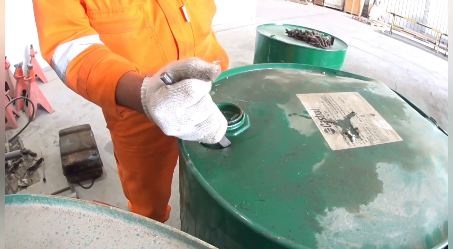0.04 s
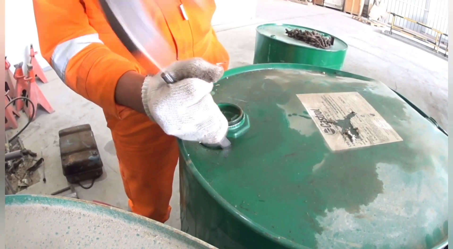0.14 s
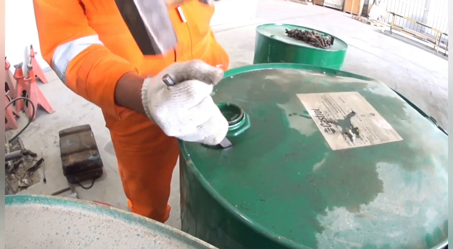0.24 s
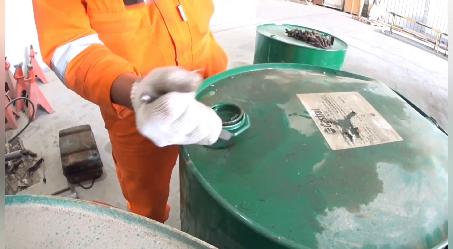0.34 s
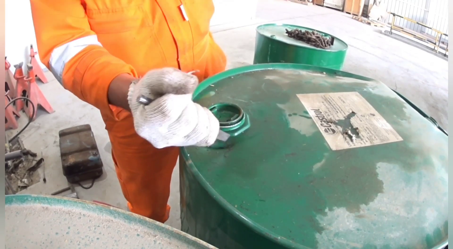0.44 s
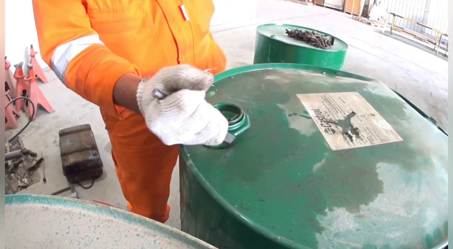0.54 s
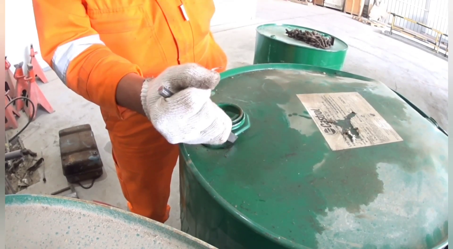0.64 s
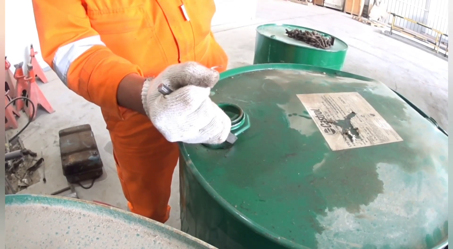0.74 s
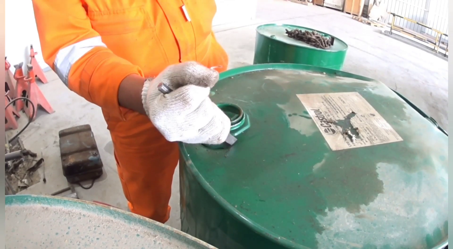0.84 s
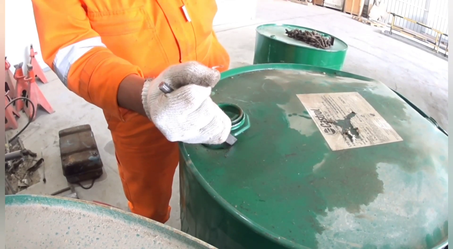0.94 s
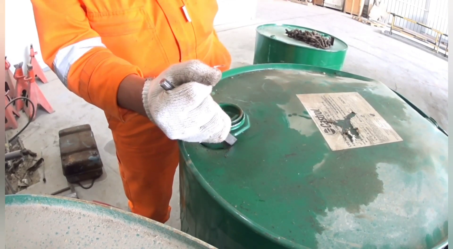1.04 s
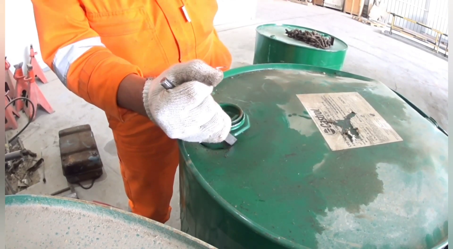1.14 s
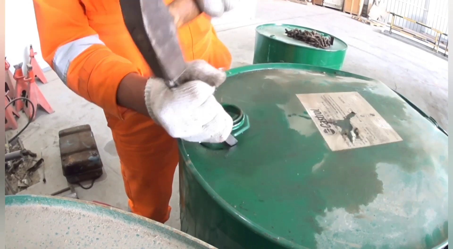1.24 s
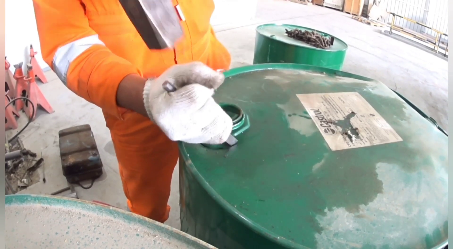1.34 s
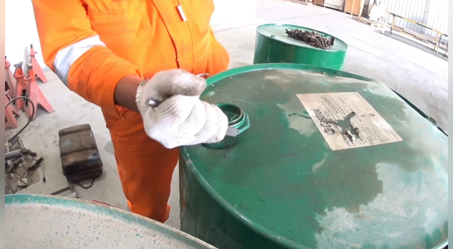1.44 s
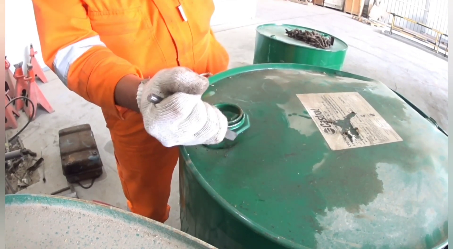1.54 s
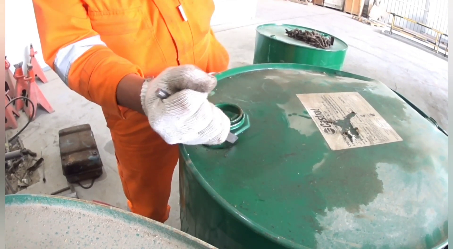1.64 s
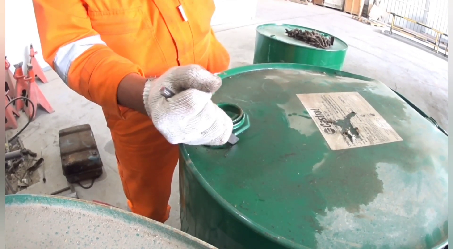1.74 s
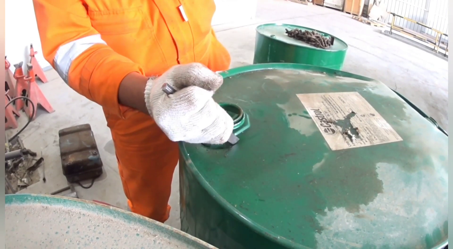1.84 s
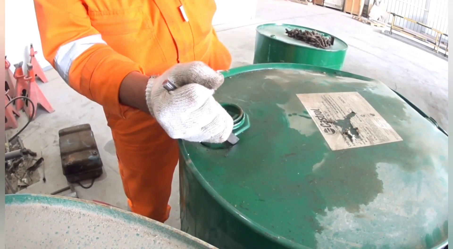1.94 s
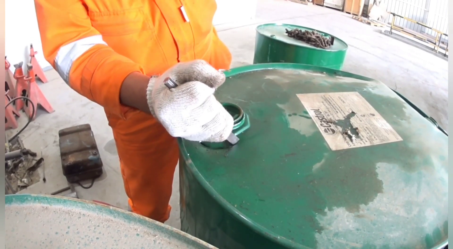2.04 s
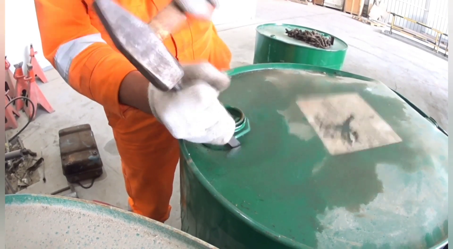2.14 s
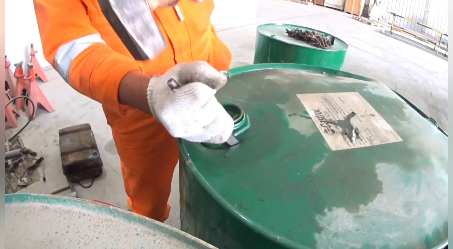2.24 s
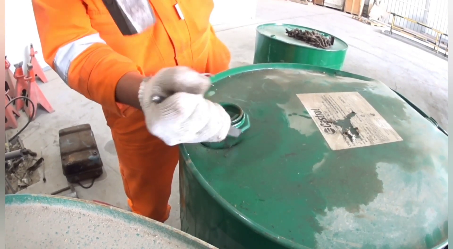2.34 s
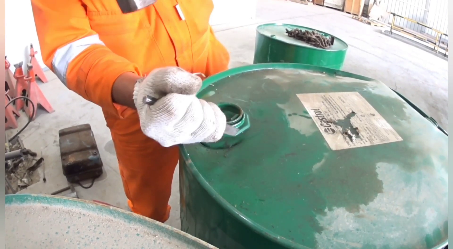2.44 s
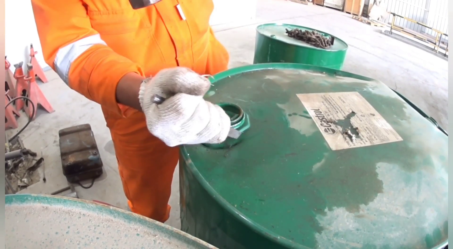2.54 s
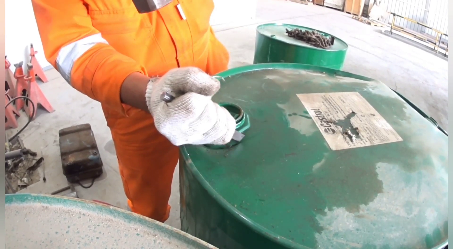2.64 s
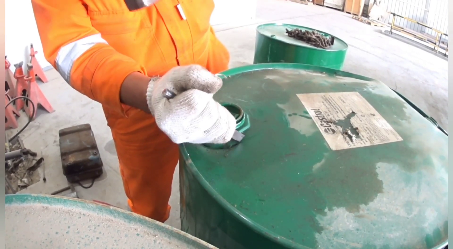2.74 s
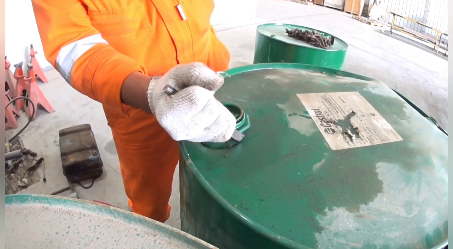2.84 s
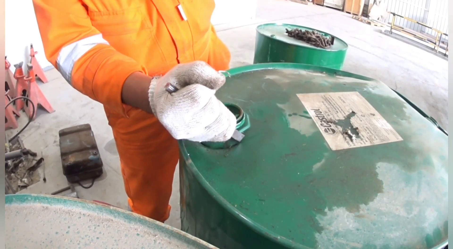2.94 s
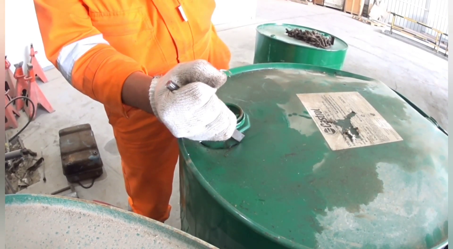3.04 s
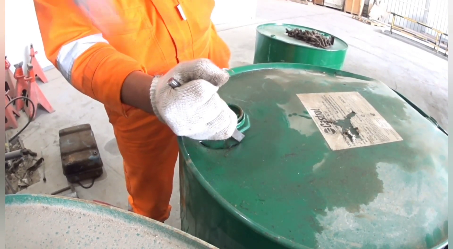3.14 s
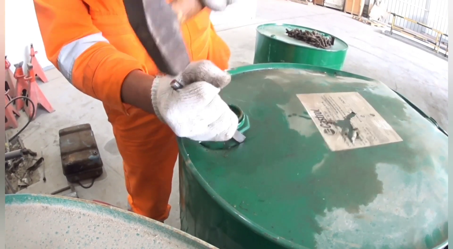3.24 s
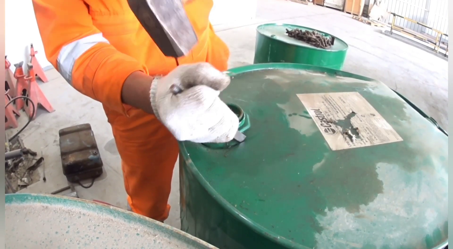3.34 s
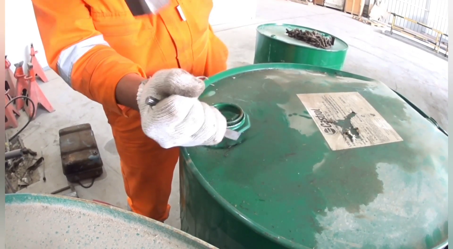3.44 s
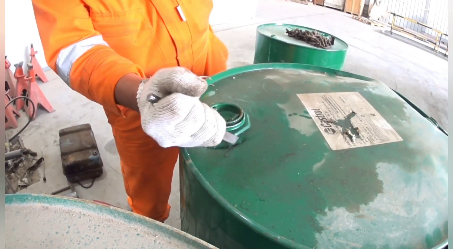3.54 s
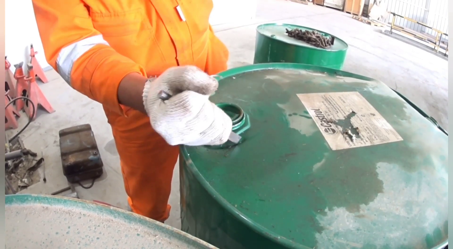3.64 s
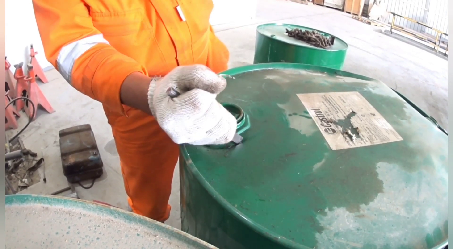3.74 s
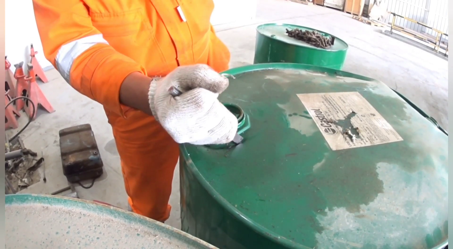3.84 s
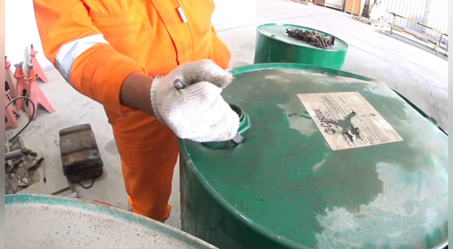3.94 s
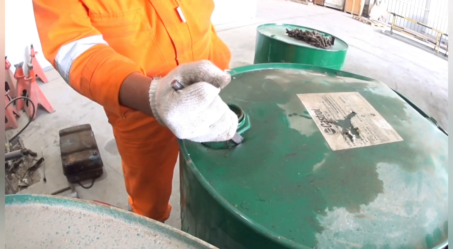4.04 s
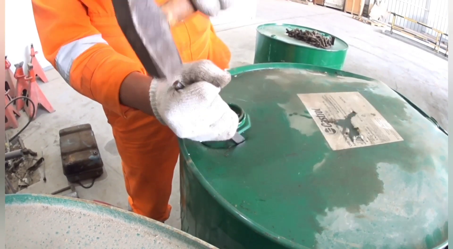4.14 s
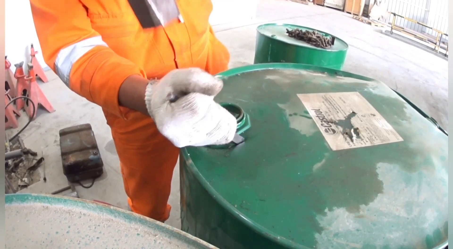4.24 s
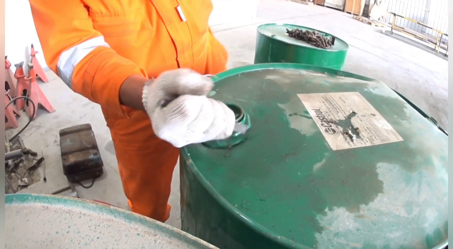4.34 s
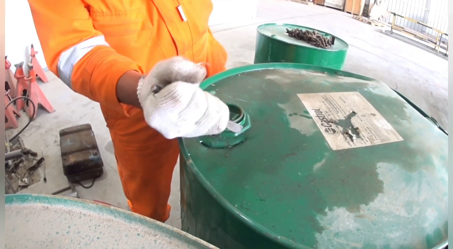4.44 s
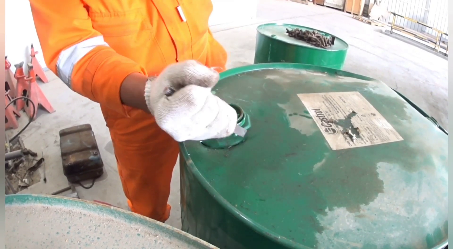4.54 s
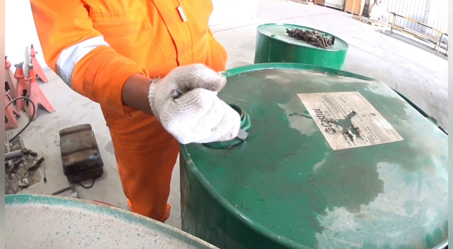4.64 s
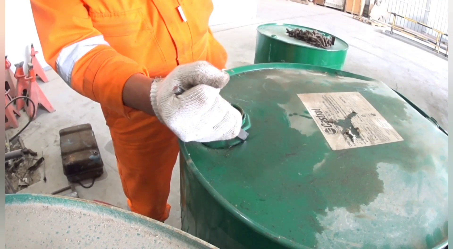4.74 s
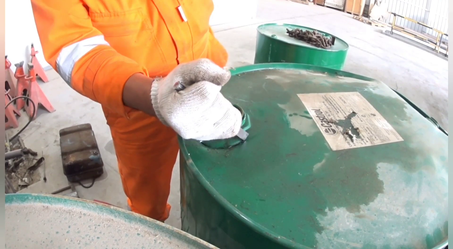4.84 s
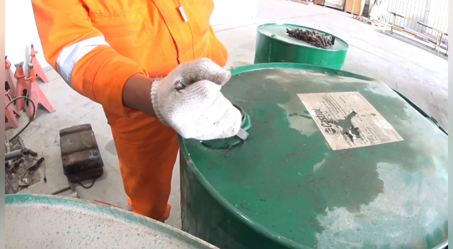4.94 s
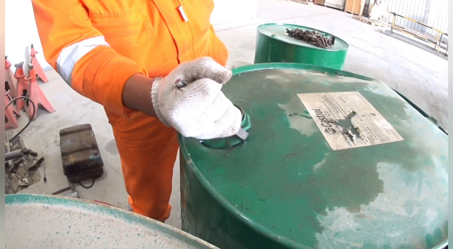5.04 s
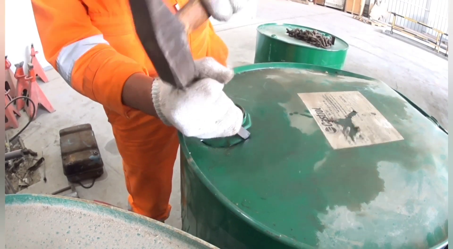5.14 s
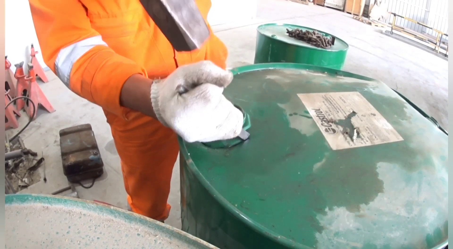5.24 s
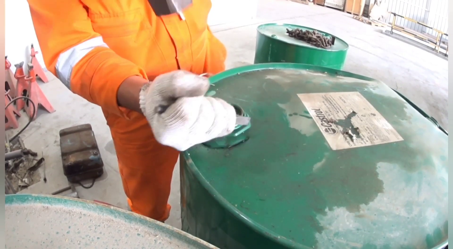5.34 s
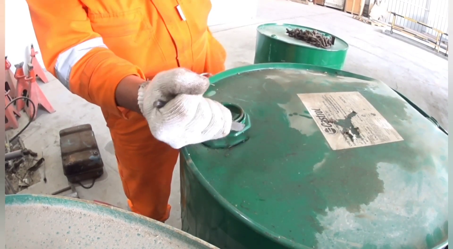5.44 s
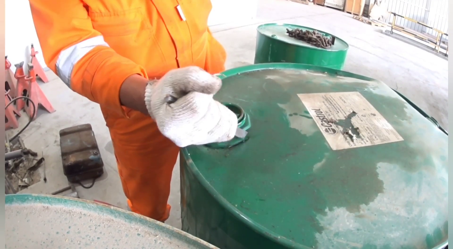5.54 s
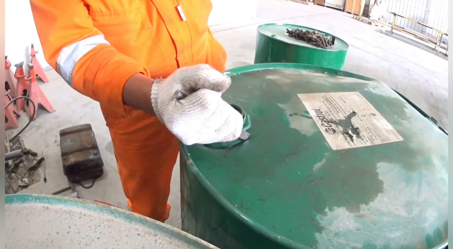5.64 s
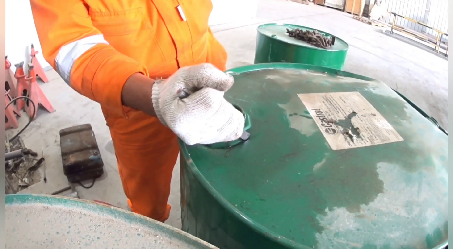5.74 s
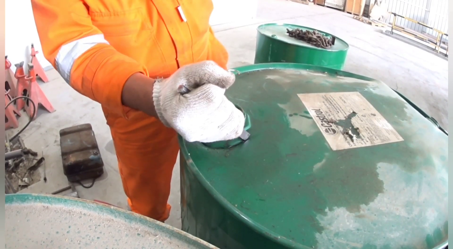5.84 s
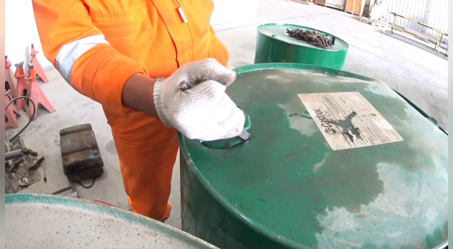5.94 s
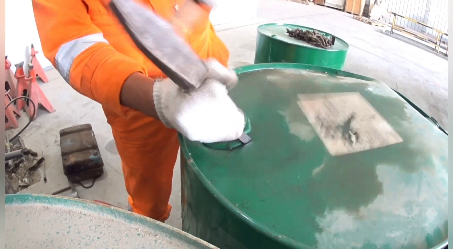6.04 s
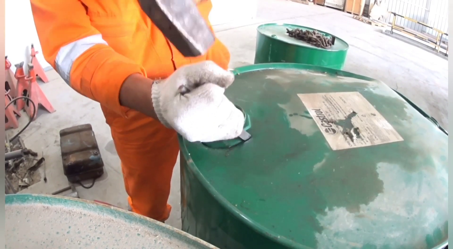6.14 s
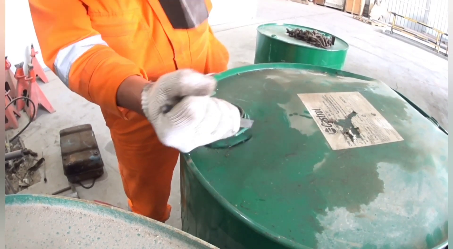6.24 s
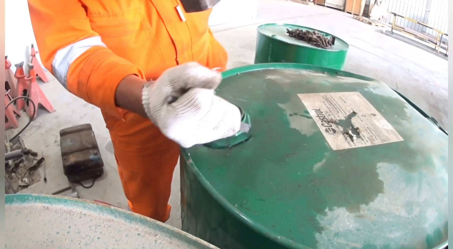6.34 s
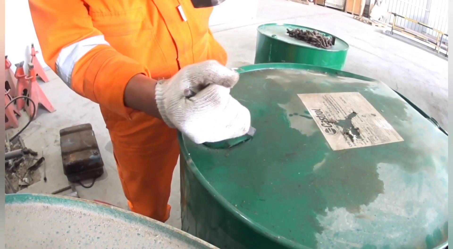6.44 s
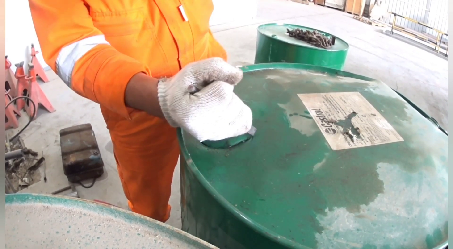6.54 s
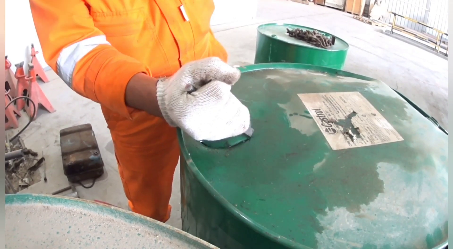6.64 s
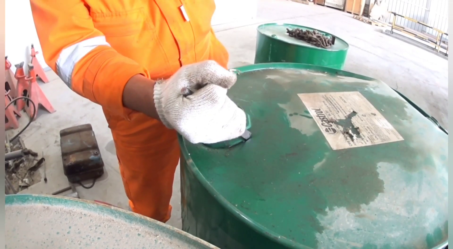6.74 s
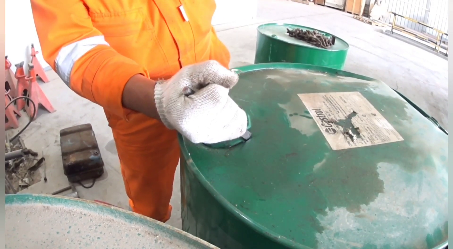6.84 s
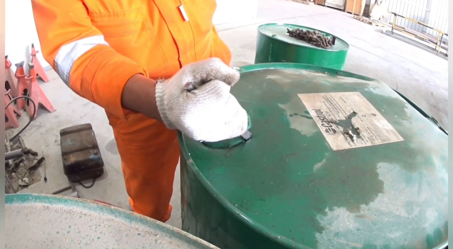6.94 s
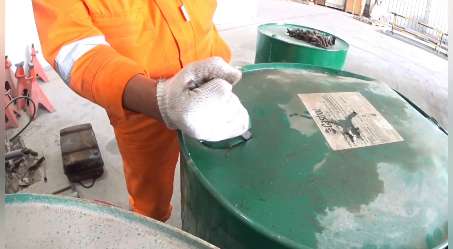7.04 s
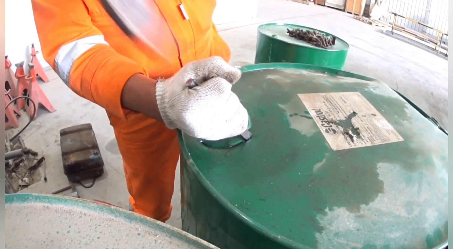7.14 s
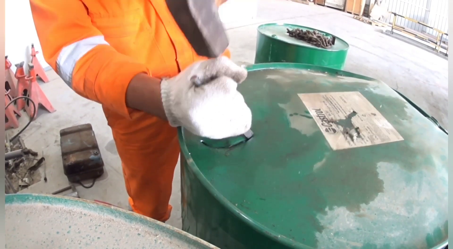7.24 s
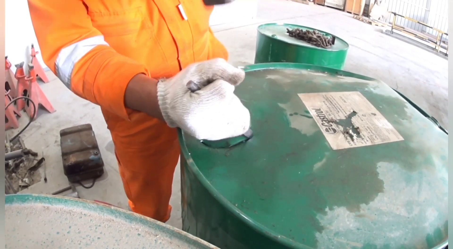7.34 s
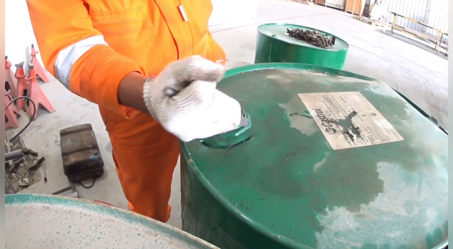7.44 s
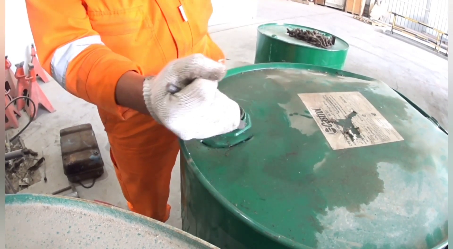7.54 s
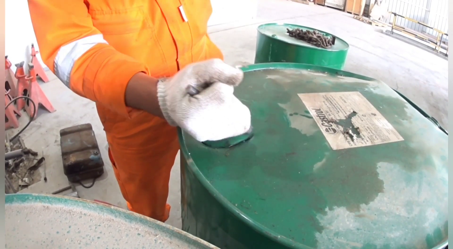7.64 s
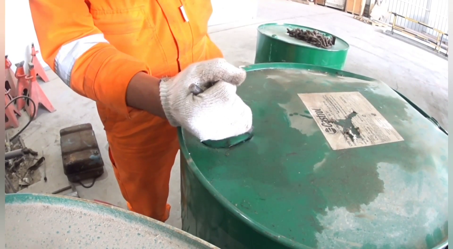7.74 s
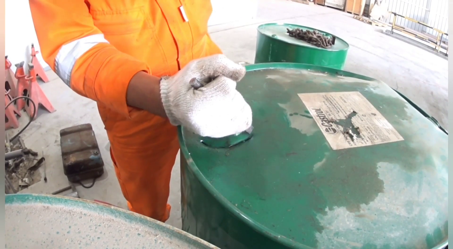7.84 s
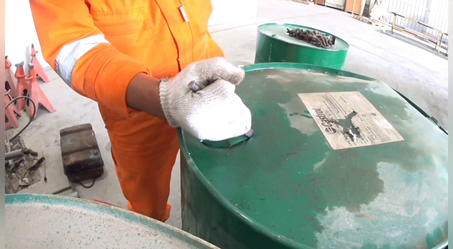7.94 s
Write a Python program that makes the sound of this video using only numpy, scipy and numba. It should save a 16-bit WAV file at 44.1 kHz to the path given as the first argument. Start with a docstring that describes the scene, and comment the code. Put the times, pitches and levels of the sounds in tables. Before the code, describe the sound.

A hammer drives a chisel into a steel drum lid about once a second, each hard clanging blow booming and ringing through a large workshop.

```python
"""Chisel on a steel drum

In a large workshop, close to two microphone ports, a hammer drives a chisel into a drum lid about once a second.
Each blow is a noise crack, decaying tones for drum and tools, and banded noise for the hall; the chisel bounces.
Far off, noise and wavering tones make the machines, a thin hiss comes and goes, and a motor whine climbs near the end.
The camera's fast gain control flattens the loudest part, then a low-pass cuts the top treble.
"""
import sys
import numpy as np
from scipy import signal
from scipy.fft import rfft, irfft
from scipy.io import wavfile
from scipy.ndimage import uniform_filter1d, map_coordinates
from numba import njit

SR = 44100
rng = np.random.default_rng(int(sys.argv[2]) if len(sys.argv) > 2 else 0)


def output_pcm(signal):
    """Save a mono or channel-first signal as 16-bit PCM at the path in sys.argv[1].

    Samples are clipped to [-1, 1] before scaling.
    """
    pcm = np.clip(np.atleast_2d(signal).T, -1, 1) * 32767
    wavfile.write(sys.argv[1], SR, np.round(pcm).astype(np.int16))


N = 352800
PAD = SR  # samples of lead-in, cut off at the end

# hammer blows; the mode levels depend on where the chisel bites:
# (time [s], strength [dB], drum boom [dB], hum [dB], bark [dB], bell [dB], hammer ring [dB])
BLOWS = [(0.197, -7.5, 1, 4.5, -22, 1, 2), (1.244, -8, -3, -5, 1, 4.5, 16), (2.190, -8, 4, 7.5, 8, 4, 3),
         (3.22, -8, 1, 2.5, -5, 1, 4), (4.129, -9.5, 10.5, 7.5, -8, 5, 3),
         (5.151, -7.5, -9, 4, 15.5, -3, 3), (6.079, -9, 4.5, -0.5, 12, 1.5, 3.5),
         (7.198, -8.5, 4, 9, -3, -9, -15)]
# a blow before the start, only its tail is heard: same columns
EARLIER_BLOW = (-.8, -8, 0, 0, 0, 0, 0)


def hammer_blows():
    """Times and strengths of the impacts, and how strongly each feeds the named drum modes and the hammer."""
    blow_s, blow_db, *named_db, hammer_db = np.transpose([EARLIER_BLOW, *BLOWS])
    return blow_s, blow_db, np.array(named_db), hammer_db


# modes of the drum, the first four are boom, hum, bark and bell:
# (frequency [Hz], relative level [dB], t60 [s])
DRUM_MODES = [(110, -22, 0.5), (206.5, -21, 2.48), (371, -20, 1.8), (416.3, -3, 1.78), (154.3, -28, 0.89),
              (250, -13, 0.88), (281.3, -12.5, 1.51), (400.3, -10, 2.25), (450.7, -3, 0.74),
              (562, -19.5, 2.8), (614, -10.5, 1.46), (640, -13, 1.77), (654, -13, 1.1), (709, -7.5, 1.46),
              (755, -12.5, 0.93), (811, -5.5, 1.31), (838, -5.5, 1.57), (883, -11.5, 1.76),
              (884, -12.5, 2.67), (968, -17.5, 3.36), (1047, -8, 1.86), (1070, -18, 2.6),
              (1143, -17.5, 2.65), (2100, -28, 1)]
DRUM_BLOOM_S, DRUM_SCATTER_DB = 0.052, 3
CONTACT_S = 0.00083  # rise time of direct steel contact


def drum_ring(blow_s, blow_db, named_db):
    """Named modes start at contact; in the others the shell takes up the lid's shaking gradually."""
    count = len(named_db)
    named = ring(blow_s, blow_db + named_db, DRUM_MODES[:count], 0, CONTACT_S)
    shell = ring(blow_s, blow_db, DRUM_MODES[count:], DRUM_SCATTER_DB, DRUM_BLOOM_S)
    return named + shell


# modes of the chisel: (frequency [Hz], relative level [dB], t60 [s])
CHISEL_MODES = [(3337, -21, .8), (5034, -15, .5), (5058, -12, .5), (5088, -19, .45), (8785, -29, .3)]
# mode of the hammer: (frequency [Hz], relative level [dB], t60 [s])
HAMMER_MODES = [(9957, -22, .45)]
CHISEL_RING_DB, TOOL_BLOOM_S = -3, .04


def tool_ring(blow_s, blow_db, hammer_db):
    """Chisel and hammer swell gradually, as they ring freely only once they have parted."""
    chisel = ring(blow_s, blow_db + CHISEL_RING_DB, CHISEL_MODES, 0, TOOL_BLOOM_S)
    hammer = ring(blow_s, blow_db + hammer_db, HAMMER_MODES, 0, TOOL_BLOOM_S)
    return chisel + hammer


# colour of the crack: (frequency [Hz], relative level per Hz [dB])
CRACK_COLOUR = [(60, -60), (200, -28), (600, -4), (1230, -13), (1700, -2), (3190, -3.5), (4570, -9.5),
                (7450, -14.5), (15000, -29), (16300, -41)]
CRACK_DB, CRACK_T60_S = -4, 0.15


def crack(blow_s, blow_db):
    """The impact itself: a noise burst that dies quickly."""
    return burst(blow_s, blow_db + CRACK_DB, CRACK_COLOUR, CRACK_T60_S)


# clear ticks as the chisel is set down again or rattles on the lid: (time [s], level [dB])
TICKS = [(0.3506, -20), (2.4304, -34), (4.3889, -30), (4.4394, -61), (4.5311, -36), (4.6155, -25),
         (7.2474, -27), (7.3352, -29), (7.3726, -29), (7.6949, -35.5)]
# colour of ticks and bounces: (frequency [Hz], relative level per Hz [dB])
TICK_COLOUR = [(300, -8.5), (1500, 10), (4000, -0.5), (8000, -13.5), (12000, -32), (16000, -39)]
TICK_T60_S, TICK_RING_DB = 0.14, 2.5
BOUNCES, BOUNCE_WITHIN_S = 12, .3  # after each blow
BOUNCE_DB, BOUNCE_SCATTER_DB, BOUNCE_FADE_DB_PER_S = -15, 3, 67
BOUNCE_RING_DB, BOUNCE_RING_T60_S = 13.5, 0.077


def chisel_ticks(blow_s, blow_db):
    """Ticks and random, weakening bounces spray noise and ring the chisel, which the glove soon stills."""
    late_s = BOUNCE_WITHIN_S * rng.random((len(blow_s), BOUNCES))
    scatter_db = BOUNCE_SCATTER_DB * rng.standard_normal(late_s.shape)
    bounce_db = blow_db[:, None] + BOUNCE_DB - BOUNCE_FADE_DB_PER_S * late_s + scatter_db
    tick_s, tick_db = np.transpose(TICKS)
    contact_s = np.append(tick_s, blow_s[:, None] + late_s)
    spray_db = np.append(tick_db, bounce_db)
    ring_db = np.append(tick_db + TICK_RING_DB, bounce_db + BOUNCE_RING_DB)
    held_modes = [(hz, mode_db, BOUNCE_RING_T60_S) for hz, mode_db, _ in CHISEL_MODES]
    spray = burst(contact_s, spray_db, TICK_COLOUR, TICK_T60_S)
    return spray + ring(contact_s, ring_db, held_modes, 0, CONTACT_S)


# colour of the filled hall, before the tilt: (frequency [Hz], relative level per Hz [dB])
HALL_COLOUR = [(15, -63), (25, -46), (80, -29.5), (159, -18.5), (273, -9.5), (400, 0), (510, -2.5),
               (831, -2.5), (1200, -3.5), (1600, -4), (2100, -4), (2900, -11.5), (4480, -27.5), (7000, -35),
               (10100, -49), (13000, -51.5), (15500, -61), (16500, -96)]
# decay of the hall: (frequency [Hz], t60 [s])
HALL_T60 = [(40, 0.28), (120, 2.33), (350, 1.39), (1000, 1.803), (2500, 1.354), (5000, 1.404),
            (8000, 1.085), (14000, 0.56)]
HALL_DB, HALL_TILT_DB_PER_OCTAVE = -0.5, 1.5
HALL_FILL_S = 0.005  # at 1 kHz
CROWD_DB, CROWD_HZ = 2.5, 12  # depth and width of the spectral ridges
RATTLE_DB, RATTLE_RATE_HZ, RATTLE_FROM_HZ = 1, 110, 5000


def hall(blow_s, blow_db):
    """Countless drum and hall modes as noise: half-octave bands fill quickly and die at their own rates."""
    spectrum, hz = noise(HALL_COLOUR)
    # modes crowd unevenly into narrow ridges and valleys; the mean power is kept
    ridges = uniform_filter1d(rng.standard_normal(len(hz)), int(CROWD_HZ / hz[1]))
    ridges_db = CROWD_DB * ridges / ridges.std()
    spectrum = spectrum * undb(ridges_db - CROWD_DB ** 2 * np.log(10) / 20)
    # the loose cap and chisel chatter on the shaking lid
    rattle = undb(RATTLE_DB * walk(RATTLE_RATE_HZ))
    out = 0
    for centre_hz in 2 ** np.arange(4.5, 14.6, .5):
        octaves_away = np.log2(hz / centre_hz + 1e-9)
        band = np.cos(np.pi * np.clip(octaves_away, -.5, .5)) ** 2
        tilt_db = HALL_TILT_DB_PER_OCTAVE * np.log2(centre_hz / 1000)
        hits = spikes(blow_s, undb(blow_db + HALL_DB + tilt_db))
        fill_s = HALL_FILL_S * (1000 / centre_hz) ** 0.073  # the bass arrives last
        envelope = fade(hits, along(HALL_T60, centre_hz), fill_s)
        chatter = rattle if centre_hz > RATTLE_FROM_HZ else 1
        out = out + irfft(spectrum * band) * envelope * chatter
    return out


WHINE_FROM_S, WHINE_ATTACK_S, WHINE_DB = 6.75, .15, -65
WHINE_FROM_HZ, WHINE_FULL_HZ, SPIN_UP_S = 4950, 10000, 3.3


def motor_whine():
    """A motor spins up: a sine climbs ever more slowly towards full speed, slightly unsteady."""
    since = np.maximum(timeline() - WHINE_FROM_S, 0)
    hz = WHINE_FULL_HZ - (WHINE_FULL_HZ - WHINE_FROM_HZ) * np.exp(-since / SPIN_UP_S)
    phase = 2 * np.pi * np.cumsum(hz * (1 + .003 * walk(120))) / SR
    onset = np.minimum(since / WHINE_ATTACK_S, 1)
    return np.sin(phase) * onset * undb(WHINE_DB + 2 * walk(30))


# colour of the motor's air noise: (frequency [Hz], relative level per Hz [dB])
AIR_COLOUR = [(2500, -28), (4500, 3.5), (6500, -3.5), (9000, -13), (13000, -25), (16000, -22)]
AIR_FROM_S, AIR_FULL_S, AIR_FROM_DB, AIR_GROWTH_DB_PER_S = 2.5, 6.5, -73, 3.5


def motor_air():
    """The motor's air noise: coloured noise, steady at first, then growing to a second steady level."""
    growing_s = np.clip(timeline(), AIR_FROM_S, AIR_FULL_S) - AIR_FROM_S
    return irfft(noise(AIR_COLOUR)[0]) * undb(AIR_FROM_DB + AIR_GROWTH_DB_PER_S * growing_s)


# colour of the drone: (frequency [Hz], relative level per Hz [dB])
SHOP_COLOUR = [(15, -67), (25, -46), (108, -18.5), (154, -13), (197, -12), (510, -5), (600, -3.5),
               (1150, -1.5), (1250, -3.5), (1730, -13), (1930, -4), (3410, -19), (5420, -35), (14400, -66),
               (16500, -64)]
# steady machine tones: (frequency [Hz], level [dB])
MACHINE_TONES = [(890, -60), (1098, -52), (2001, -55)]
SHOP_DB = -38


def far_machines():
    """A gently swelling noise drone, with tones that waver in phase and level."""
    t = timeline()
    drone = irfft(noise(SHOP_COLOUR)[0]) * undb(SHOP_DB + 0.82 * walk(2.78))
    for hz, db in MACHINE_TONES:
        phase = 2 * np.pi * hz * t + 3.4 * walk(8.4)
        drone = drone + np.sin(phase) * undb(db + 3 * walk(16))
    return drone


# colour of the thin hiss once up to pitch: (frequency [Hz], relative level per Hz [dB])
HISS_COLOUR = [(11500, -44), (12400, 4), (13100, -8), (14200, 1), (15400, -48)]
HISS_FROM_S, HISS_TO_S, HISS_EDGE_S = .72, 3.9, .12
HISS_DB, HISS_SAG_DB_PER_S = -76, 3.5
HISS_SLIDE, HISS_SLIDE_S = .05, .25  # starting pitch deficit (fraction) and its decay time


def far_hiss():
    """A thin far hiss sets in, slides up to pitch, sinks slowly and stops."""
    t = timeline()
    since = np.maximum(t - HISS_FROM_S, 0)
    place = np.cumsum(1 - HISS_SLIDE * np.exp(-since / HISS_SLIDE_S))  # played slower at first
    hiss = np.array([map_coordinates(x, [place], order=3) for x in irfft(noise(HISS_COLOUR)[0])])
    gate = np.clip(np.minimum(since, HISS_TO_S - t) / HISS_EDGE_S, 0, 1)
    return hiss * gate * undb(HISS_DB - HISS_SAG_DB_PER_S * since + 4 * walk(5))


# the two microphone ports:
# (frequency [Hz], shared power [0-1], left minus right [dB], left leads by [rad])
PORTS = [(30, .998, 0, 0), (150, .99, -.6, -.06), (300, .99, 0, 0), (430, .98, 1.3, 0), (600, .88, 5.5, 0),
         (780, .82, 8.7, -.4), (900, .74, 8.2, -.95), (1100, .66, 4, -.95), (1420, .78, 2.8, -.6),
         (2150, .82, 4, -.95), (2600, .79, 1, -.84), (4000, .79, .4, -.54), (7000, .85, -.5, -.26),
         (13000, .88, .3, -.15)]


def ports(paths):
    """Both ports share the first path, take the second in opposite sign; the housing tilts level and phase."""
    a, b = rfft(paths)
    hz = np.fft.rfftfreq(N + PAD, 1 / SR)
    shared, balance_db, lead = (along(np.array(PORTS)[:, [0, k]], hz) for k in (1, 2, 3))
    like = np.sqrt(shared)
    mid = a * np.sqrt((1 + like) / 2)
    side = b * np.sqrt((1 - like) / 2)
    tilt = undb(balance_db / 2) * np.exp(.5j * lead)
    return irfft(np.array([(mid + side) * tilt, (mid - side) / tilt]))


@njit
def gain_control(x, top, power, attack, release, ahead):
    """One follower, looking slightly ahead at the louder channel, turns both channels down."""
    y, level = np.empty_like(x), 1e-6
    for i in range(x.shape[1]):
        j = min(i + ahead, x.shape[1] - 1)
        size = max(abs(x[0, j]), abs(x[1, j]))
        level += (size - level) * (attack if size > level else release)
        gain = min(1., top / level) ** power
        y[0, i], y[1, i] = x[0, i] * gain, x[1, i] * gain
    return y


def undb(db):
    """Decibels to amplitude."""
    return np.exp(np.asarray(db) * (np.log(10) / 20))


def timeline():
    """Time of every sample in seconds, negative during the lead-in."""
    return (np.arange(N + PAD) - PAD) / SR


def along(table, hz):
    """Read (frequency, value) rows on a log-frequency axis."""
    at, value = np.transpose(table)
    return np.interp(np.log(hz + 1), np.log(at + 1), value)


def spikes(s, size):
    """Impulses at the given times on a line that starts PAD samples early."""
    out = np.zeros(N + PAD)
    out[np.round(np.asarray(s) * SR).astype(int) + PAD] = size
    return out


def fade(x, t60, rise_s):
    """Every impulse swells over rise_s and leaves an exponential tail."""
    tail = signal.lfilter([1], [1, -np.exp(-np.log(1000) / (t60 * SR))], x)
    keep = np.exp(-1 / (rise_s * SR))
    return signal.lfilter([1 - keep], [1, -keep], tail)


def noise(table):
    """Spectra of two unrelated noises of the given colour, rms 1, and their frequencies."""
    hz = np.fft.rfftfreq(N + PAD, 1 / SR)
    white = rng.standard_normal((2, N + PAD))
    x = irfft(rfft(white) * undb(along(table, hz)))
    return rfft(x / x.std()), hz


def walk(rate):
    """Random levels held about 1 / rate s and smoothed twice."""
    step = 16  # samples per coarse point
    k = int(SR / rate / step)
    size = (N + PAD) // step + 1
    held = np.repeat(rng.standard_normal(size // k + 1), k)
    coarse = uniform_filter1d(uniform_filter1d(held, k), k)[:size]
    return np.interp(np.arange(N + PAD) / step, np.arange(size), coarse)


RING_DB, RING_FLUTTER_DB, RING_RISE_CYCLES = -10, 2.5, 9


def ring(s, db, modes, scatter_db, bloom_s):
    """Each strike makes every mode (db: one row a mode) swell over some cycles and flutter as its echoes mix."""
    out, t = np.zeros((2, N + PAD)), np.arange(N + PAD) / SR
    rows_db = np.broadcast_to(db, (len(modes), len(s)))
    for (hz, mode_db, t60), strike_db in zip(modes, rows_db):
        scatter = scatter_db * rng.standard_normal(len(s))
        hits = spikes(s, undb(strike_db + mode_db + RING_DB + scatter))
        flutter = undb(RING_FLUTTER_DB * walk(14))
        envelope = fade(hits, t60, RING_RISE_CYCLES / hz + bloom_s) * flutter
        phase = 2 * np.pi * hz * t + 1.36 * walk(11)
        out += envelope * np.array([np.sin(phase), np.cos(phase)])  # two paths a quarter cycle apart
    return out


def burst(s, db, colour, t60):
    """A short spray of noise as steel meets steel."""
    return irfft(noise(colour)[0]) * fade(spikes(s, undb(db)), t60, CONTACT_S)


def scene():
    """Blows, chisel bounces, hall and far machines meet at the two microphone ports."""
    blow_s, blow_db, named_db, hammer_db = hammer_blows()
    steel = drum_ring(blow_s, blow_db, named_db) + tool_ring(blow_s, blow_db, hammer_db)
    near = steel + crack(blow_s, blow_db) + chisel_ticks(blow_s, blow_db)
    far = motor_whine() + motor_air() + far_machines() + far_hiss()
    return ports(near + hall(blow_s, blow_db) + far)[:, PAD:]


HOLD_DB, RATIO = -6, 5.1
ATTACK_S, RELEASE_S, AHEAD_S = 0.0001, 0.014, 0.00138
TOP_HZ = 16300


def record(dry):
    """The camera's fast gain control, then a steep low-pass."""
    power = 1 - 1 / max(RATIO, 1)
    attack, release = 1 / (ATTACK_S * SR), 1 / (RELEASE_S * SR)
    held = gain_control(dry, undb(HOLD_DB), power, attack, release, int(AHEAD_S * SR))
    return signal.sosfilt(signal.ellip(8, .2, 70, TOP_HZ, fs=SR, output="sos"), held)


dry = scene()
out = record(dry)
output_pcm(out)
```